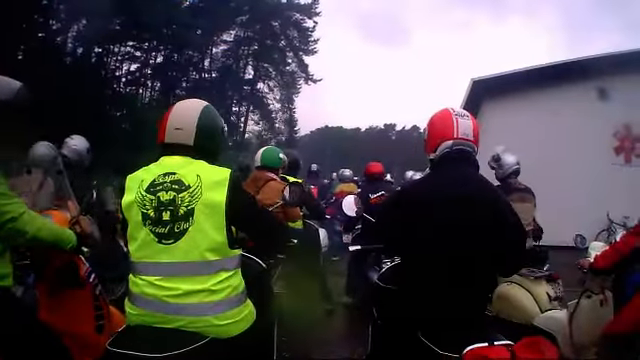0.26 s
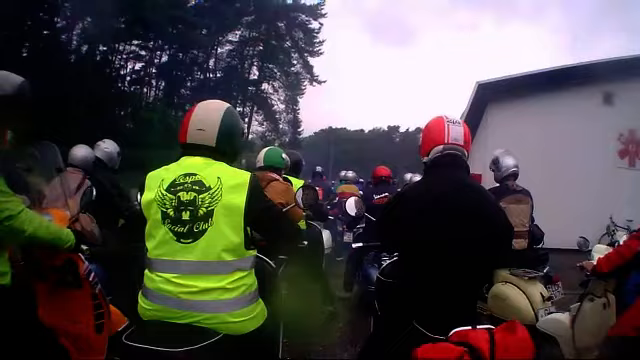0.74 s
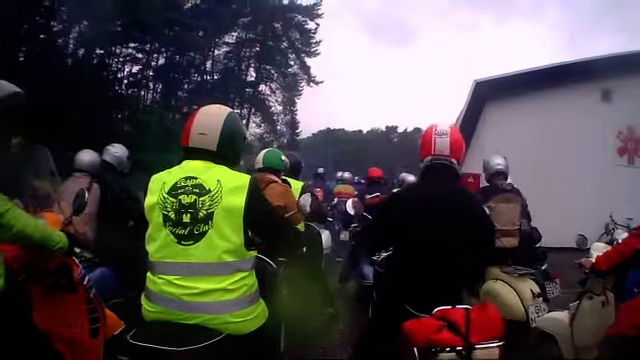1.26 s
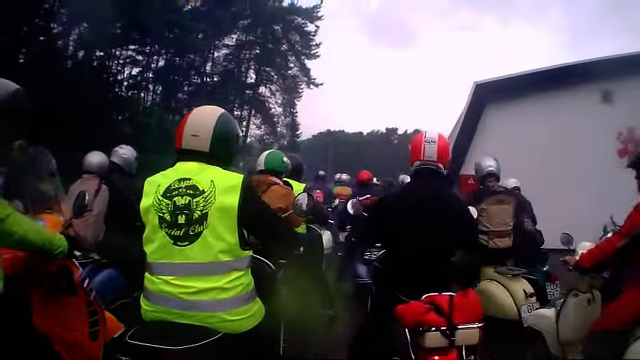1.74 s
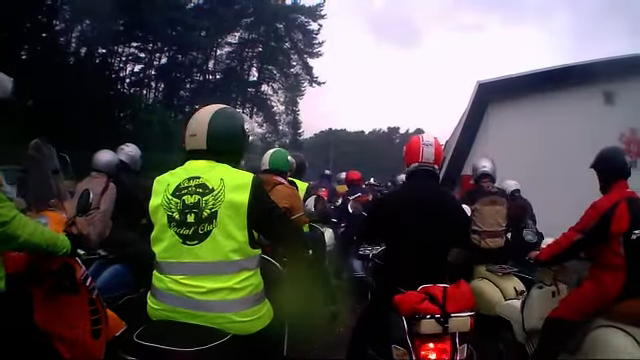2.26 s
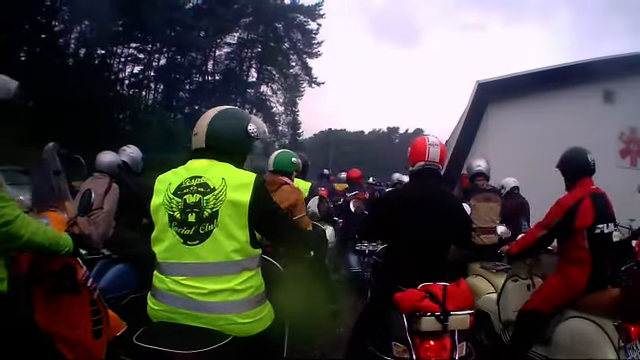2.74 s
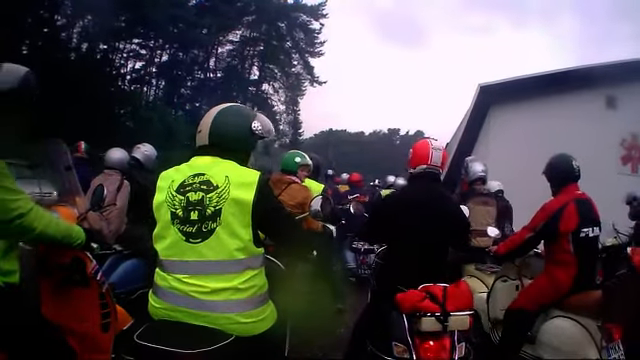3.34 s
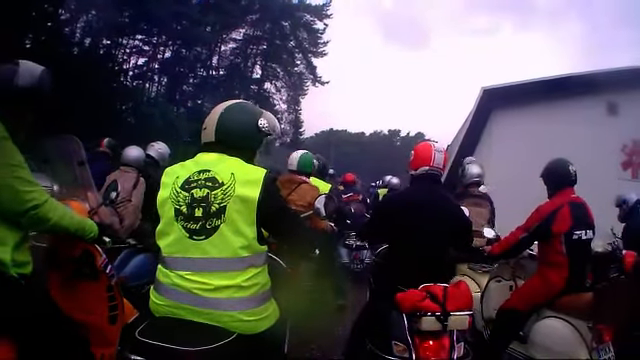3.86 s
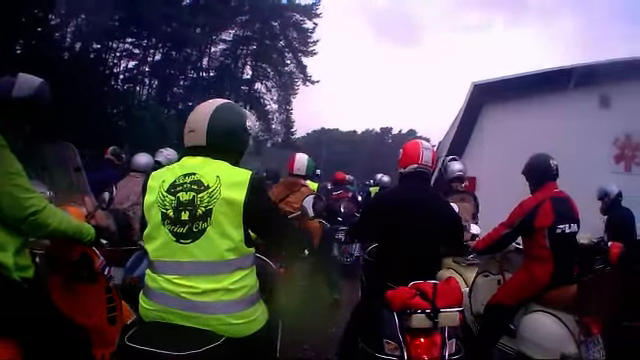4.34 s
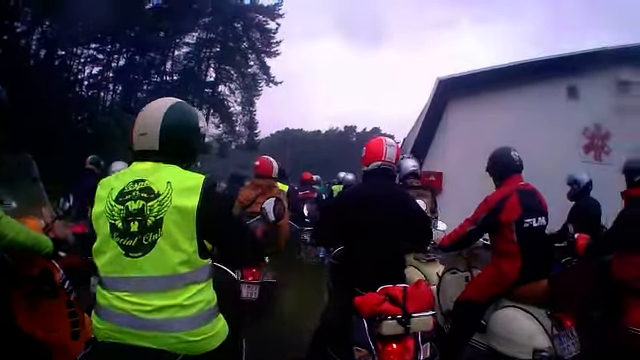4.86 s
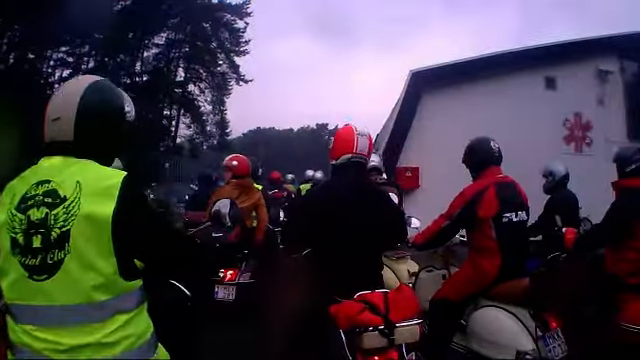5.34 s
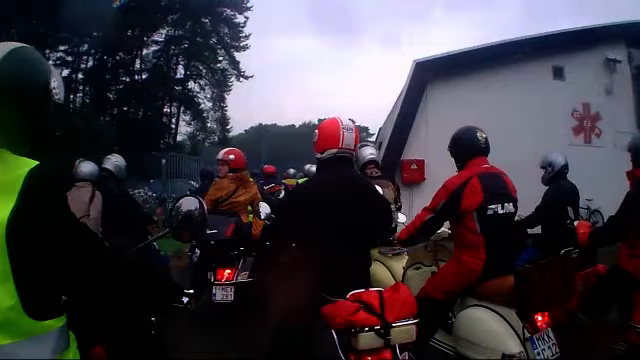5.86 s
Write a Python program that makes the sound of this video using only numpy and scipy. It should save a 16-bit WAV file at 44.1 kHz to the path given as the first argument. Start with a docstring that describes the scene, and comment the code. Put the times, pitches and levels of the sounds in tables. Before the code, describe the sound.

A small scooter engine idles very close from the start, firing about fifteen times a second: a low wavering hum, soft dull exhaust thumps and a dry plastic rattle from the shaken camera housing. Many other engines form a patchy, muffled drone behind it outdoors. From 0.5 to 1.0 s a regular run of heavier chugs jolts the housing. A hollow bump lands at 1.3 s, a sharp clack near 1.45, then the loudest hard, clipped knocks at 2.0-2.3 s. Smaller knocks and buzzing rattle continue to about 3.7 s, followed by a calmer idle. At 4.3 s an engine takes over, revving quickly to a peak around 5.1 s and falling back by 5.75, with strong rattles, knocks at 4.6 and a dense rough burst at 5.4-5.7. A duller hollow bump comes at 5.8 s as the idle returns. Cheap, boxy microphone, little treble.

```python
"""Small scooters wait in a queue; a camera rides on one of them. From the start its single cylinder idles
(wavering sines), thumps ring its exhaust pipe, shaking rattles the camera housing (noisy contacts ring its
modes), far engines drone (patchy noise) and knocks ring the housing. From 0.5 s a run of heavy firings
jolts it, and at 1.3 s and 5.8 s something hollow is bumped. At 4.3 s another engine revs up and falls back,
taking over from the idle until 5.75 s. A cheap microphone cuts the treble and clips the hardest knocks."""
import sys
import numpy as np
from scipy import signal
from scipy.io import wavfile
from scipy.ndimage import uniform_filter1d

SR = 44100
rng = np.random.default_rng(int(sys.argv[2]) if len(sys.argv) > 2 else 0)


def wav_record(signal):
    """Record a signal, one row per channel, as 16-bit PCM in the file named by sys.argv[1]."""
    frames = np.transpose(np.atleast_2d(signal))
    bounded = np.clip(frames, -1, 1)
    # unit amplitude maps onto the largest positive 16-bit level
    quanta = np.round(bounded * 32767).astype(np.int16)
    wavfile.write(sys.argv[1], SR, quanta)


def voltage_ratio(decibels):
    """Convert decibels (scalar or array-like) to amplitude ratios, 20 dB per decade."""
    exponent = np.asarray(decibels, float) / 20
    return 10 ** exponent


N = 269010

# idling engine: (time [s], firing rate [1/s], gain on its orders [dB])
IDLE_TRACK = [(0.0, 14.6, -41), (0.05, 16.6, -31.5), (0.4, 14.7, -46), (0.55, 14.4, -33),
              (0.95, 16.4, -39.5), (1.2, 15.7, -42.5), (1.6, 16, -42), (2.0, 15, -48), (2.2, 15.03, -35),
              (3.0, 15.03, -32), (3.36, 15.03, -33), (3.49, 14.57, -35), (3.95, 14.6, -32),
              (4.1, 15.2, -48), (4.35, 15.06, -25.5), (5.7, 15.73, -40), (5.85, 13.15, -36),
              (6.1, 14.6, -41)]
# its hum: (multiple of the firing rate, relative level [dB])
IDLE_ORDERS = [(2, -10), (3, 0.5), (4, -20), (5, -24.5), (6, -22.5), (8, -24.5), (9, -10), (11, -16),
               (12, -14)]
# strength of the exhaust thumps: (time [s], level [dB])
EXHAUST_TRACK = [(0.0, -32), (0.15, -40.5), (0.38, -45.5), (0.51, -43), (0.85, -38), (1.1, -49.5),
                 (1.85, -54.5), (2.3, -42), (2.9, -40), (3.26, -39.5), (3.5, -41.5), (3.97, -40.5),
                 (4.06, -50), (4.4, -37.5), (4.57, -32), (4.77, -34), (5.08, -29.5), (5.28, -47.5),
                 (5.47, -21.5), (5.69, -30), (5.74, -48), (5.9, -34.5), (6.1, -49.5)]
# exhaust resonances: (frequency [Hz], width [Hz], relative level [dB])
PIPE_MODES = [(143, 61, -3.5), (179, 59, 7), (237, 240, -4)]
# shaking of the mount: (time [s], rattle level [dB])
SHAKE_TRACK = [(0.0, -31.5), (0.33, -40), (0.52, -32.5), (1.04, -33.5), (1.25, -39), (1.95, -42),
               (2.25, -29), (2.52, -27), (2.65, -34.5), (2.92, -26), (3.26, -28), (3.48, -33),
               (3.63, -27.5), (3.95, -30), (4.0, -43.5), (4.19, -44), (4.23, -30), (4.4, -22.5),
               (4.47, -30), (4.59, -17), (4.8, -36), (4.97, -24), (5.12, -28.5), (5.24, -38.5), (5.48, -17),
               (5.64, -17.5), (5.72, -34), (5.93, -31.5), (6.1, -37.5)]
# camera housing modes: (frequency [Hz], width [Hz], limited in ring(), relative level [dB])
HOUSING_MODES = [(605, 360, -46.5), (738.5, 29, -6), (811, 44, 4), (905.6, 41.3, 6), (1180, 220, -37),
                 (1638, 140, 2.5), (1771, 85, 3.5), (1900, 240, -1), (2454, 226, 1.5), (2757, 110, -3.5),
                 (3250, 1200, -36.5)]
# limits between the dull, middle and bright housing modes: (frequency [Hz])
PART_LIMITS_HZ = [1100, 2200]
# spectrum of the far engines: (frequency [Hz], relative level [dB per Hz])
DRONE_SPECTRUM = [(12, -25.5), (20, 0), (53, -0.5), (97, -13.5), (167, -8), (396, -9), (584, 3.5),
                  (921, -1), (1220, -18.5), (1760, -10), (2140, -18), (2840, -12.5), (3520, -18.5),
                  (4580, -54.5), (7740, -120)]
# loud knocks, peak of each part: (time [s], dull [dB], middle [dB], bright [dB], thud [dB])
KNOCK_ROWS = [(.046, -24, -23, -33.5, -30), (.148, -20.5, -26, -38.5, -24), (.191, -21.5, -28, -29.5, -45),
              (.243, -21, -30.5, -32.5, -26), (.39, -25, -33.5, -29.5, -43), (.894, -11.5, -16.5, -17, -43),
              (1.137, -22.5, -26, -32, -50), (1.202, -22.5, -18.5, -25.5, -28),
              (1.29, -21.5, -30, -22.5, -41), (1.329, -20, -10, -9, -27), (1.349, -17, -21.5, -28, -45),
              (1.369, -24, -24.5, -28, -42), (1.389, -23, -27, -33, -46), (1.458, -13.5, 4, -1, -39),
              (1.568, -23, -29.5, -38, -48), (1.597, -30, -30, -43, -52), (1.629, -13.5, -9.5, -21.5, -33),
              (1.661, -23, -33, -44, -53), (1.694, -30, -33, -33.5, -50), (1.892, -30, -17.5, -33, -29),
              (2.003, -18, -3, -12, -42), (2.014, -8, 8.5, 2.5, -25), (2.087, -9, -6, -21.5, -31),
              (2.138, -17.5, -22, -20, -50), (2.189, -17.5, -11.5, -20, -33.5), (2.201, -7, 8.5, 6, -21.5),
              (2.267, 0, 6.5, 0, -21.5), (2.326, -13.5, -15, -17.5, -32), (2.388, -14, -11, -9.5, -40),
              (2.454, -15, -10, -14, -33), (2.521, -18.5, -11.5, -13, -30), (2.575, -14.5, -27, -16, -31),
              (2.696, -19.5, -22, -20.5, -36.5), (2.792, -13, -12, -11.5, -32),
              (2.865, -26.5, -16, -19, -26), (2.956, -17, -19, -27, -25), (3.089, -17.5, -14.5, -20, -33),
              (3.171, -11, -17, -28.5, -32), (3.27, -14, -16.5, -21, -30), (3.329, -20, -18, -19.5, -43),
              (3.551, -14, -8, -9, -42), (3.74, -25, -16, -23, -48), (4.052, -25, -30.5, -32.5, -46),
              (4.164, -26.5, -27, -26.5, -37), (4.216, -17.5, -18, -18.5, -45),
              (4.381, -12.5, -12, -26, -15), (4.465, -26, -37, -21, -40), (4.579, -9, -1, -0.5, -13.5),
              (4.642, -13.5, -15, -22.5, -22), (4.687, -17, -9.5, -12, -18),
              (4.736, -22, -24.5, -22.5, -37), (5.024, -16.5, -14, -32, -32), (5.05, -11.5, -9, -26.5, -31),
              (5.079, -11.5, -15.5, -15, -22), (5.108, -14.5, -21.5, -21.5, -23),
              (5.139, -14.5, -16, -25, -25), (5.324, -17, -23, -22, -27.5),
              (5.35, -11.5, -17.5, -20.5, -28), (5.377, -9, -18, -29.5, -16.5), (5.442, -3.5, -1, 3.5, -12),
              (5.481, 0.5, -13.5, -8.5, -14), (5.5, -2, -12.5, -10, -17.5),
              (5.52, -22.5, -15.5, -22.5, -30), (5.541, -12.5, -8.5, -12.5, -15),
              (5.55, -13.5, -6, -11.5, -21), (5.569, -13.5, -5.5, -13, -21), (5.608, -9, -15, -22, -18),
              (5.638, -16.5, -7.5, -19.5, -25), (5.661, -10, -7.5, -18.5, -20),
              (5.769, -19, -23.5, -27.5, -37), (5.8, -6.5, -23.5, -23, -32)]
# peaks in the run of heavy firings, before fade and spread: (dull [dB], middle [dB], bright [dB], thud [dB])
CHUG_PEAKS_DB = (-14.5, -25, -26.5, -19.5)
# hollow bumps, perhaps on the bodywork: (time [s], peak [dB])
BUMP_ROWS = [(1.329, -4.5), (5.8, -15.5)]
# what the bumps ring: (frequency [Hz], width [Hz], relative level [dB])
HOLLOW_MODES = [(480, 300, -15), (684, 110, 8.5), (1430, 160, 1)]
# revving engine: (time [s], firing rate [1/s], gain on its orders [dB])
REV_TRACK = [(4.3, 22.4, -35), (4.43, 24.3, -34.5), (4.59, 27.1, -26), (4.76, 31.5, -39), (4.93, 32.8, -27),
             (5.1, 34.1, -28.5), (5.256, 30.3, -33), (5.308, 28.8, -50), (5.374, 26.9, -27.5),
             (5.54, 21.8, -26), (5.619, 22, -26.5), (5.75, 17.7, -51.5)]
# its hum: (multiple of the firing rate, relative level [dB])
REV_ORDERS = [(1, -10), (2, 1), (3, -25.5), (4, -5.5), (5, -13), (6, -12), (7, -15), (8, -14)]


def evened(x):
    """Scales to rms 1."""
    return x / np.sqrt(np.mean(x ** 2) + 1e-20)


def curves(rows):
    """Interpolates the columns of a table to every sample."""
    time_s, *columns = np.transpose(rows)
    return [np.interp(np.arange(N) / SR, time_s, column) for column in columns]


def slow(per_s):
    """Smooth chance of rms 1: noise averaged twice over 1 / per_s seconds."""
    span = int(SR / per_s)
    once = uniform_filter1d(rng.standard_normal(N), span)
    return evened(uniform_filter1d(once, span))


def ring(hz, width_hz, db):
    """One struck mode: a sine that dies faster the wider its resonance."""
    t = np.arange(4096) / SR
    decay = np.exp(-np.pi * np.clip(width_hz, 10, 900) * t)
    return voltage_ratio(db) * decay * np.sin(2 * np.pi * hz * t)


def ring_all(modes):
    """Sum of struck modes."""
    return sum(ring(*mode) for mode in modes)


def no_bass(x, hz):
    """Steep high-pass."""
    return signal.sosfilt(signal.butter(4, hz, "high", fs=SR, output="sos"), x)


def strokes(turns, jitter_s):
    """One click of about size 1 near every whole turn."""
    at = np.flatnonzero(np.diff(np.floor(turns)) > 0)
    shift = (jitter_s * SR * rng.standard_normal(N)[at]).astype(int)
    clicks = np.zeros(N)
    clicks[np.clip(at + shift, 0, N - 1)] = 1
    return clicks


def hum(turns, orders, waver_db):
    """Low engine orders as sines, each wavering in strength."""
    total = 0
    for multiple, db in orders:
        strength = np.sqrt(2) * voltage_ratio(db + waver_db * slow(10))
        total = total + strength * np.sin(2 * np.pi * (multiple * turns + rng.random()))
    return total


def idler():
    """Hum of the idling engine, giving way to the revving one; returns it with the firing rate."""
    rate_hz, gain_db = curves(IDLE_TRACK)
    orders = hum(np.cumsum(rate_hz) / SR, IDLE_ORDERS, waver_db=1.0)
    return (1 - revving()) * voltage_ratio(gain_db) * orders, rate_hz


def exhaust(rate_hz):
    """One uneven thump per firing, over a rough burble, rings in the pipe."""
    fired = strokes(np.cumsum(rate_hz) / SR + .1, jitter_s=0.00033)
    fired *= voltage_ratio(2.4 * rng.standard_normal(N))
    burble = 0.009 * rng.standard_normal(N)
    puff = signal.windows.hann(120)  # a soft push keeps the thump dull
    pipe = np.convolve(puff, ring_all(PIPE_MODES))
    thumps = signal.oaconvolve(fired + burble, pipe)[:N]
    per_firing = np.sqrt(np.mean(rate_hz) / rate_hz)  # faster firing, same loudness
    return voltage_ratio(curves(EXHAUST_TRACK)[0]) * evened(per_firing * thumps)


def housing_parts():
    """The housing's modes in a dull, a middle and a bright group; the small shell sends out no bass."""
    group = np.searchsorted(PART_LIMITS_HZ, [hz for hz, width_hz, db in HOUSING_MODES])
    parts = []
    for part in range(3):
        modes = [mode for mode, g in zip(HOUSING_MODES, group) if g == part]
        parts.append(no_bass(ring_all(modes), hz=450))
    return parts


def rattle(swing_hz):
    """A loose part hits its stop on every swing of the frame, out and back, with stray ticks between."""
    miss_db, reach_db = -46, 14  # below this shaking few swings hit the stop; this much above, all do
    contact_decay_s = 0.0011
    level_db = curves(SHAKE_TRACK)[0]
    turns = np.cumsum(swing_hz) / SR + .3
    hits = strokes(turns, jitter_s=0.00095) + voltage_ratio(2.5) * strokes(turns + .55, jitter_s=0.0013)
    hits += voltage_ratio(-6.5) * (rng.random(N) < 110 / SR)  # stray ticks, 110 per s before misses
    hits *= rng.random(N) < np.clip((level_db - miss_db) / reach_db, .15, 1)  # weak swings often fall short
    hits *= voltage_ratio(3.0 * np.clip(rng.standard_normal(N), -3, 1.6) + 1.2 * slow(20))  # uneven strength
    contact = signal.lfilter([1], [1, -np.exp(-1 / (contact_decay_s * SR))], hits)
    shared_noise = rng.standard_normal(N)
    total = 0
    for part, body in enumerate(housing_parts()):
        noise = shared_noise + 1.03 * rng.standard_normal(N)
        flicker = voltage_ratio(part * (-0.22 + 0.91 * slow(16)))  # strongest in the bright group
        total = total + flicker * signal.oaconvolve(contact * noise, body)[:N]
    return voltage_ratio(level_db) * evened(total)


def drone():
    """The rest of the queue blurs into patchy noise that the shaken housing passes on more strongly."""
    level_db, patch_db, swell_per_shake_db = -38.5, 1.3, 0.31
    bin_hz = np.fft.rfftfreq(1024, 1 / SR)
    real, imag, patches = rng.standard_normal((N // 256 + 5, 513, 3)).T
    patches = uniform_filter1d(patches, 8, 0)  # over frequency
    patches = evened(uniform_filter1d(patches, 10, 1))  # over time
    hz, db = np.transpose(DRONE_SPECTRUM)
    spectrum_db = np.interp(np.log(bin_hz + 1), np.log(hz + 1), db)
    bins = (real + 1j * imag) * voltage_ratio(spectrum_db[:, None] + patch_db * patches)
    noise = signal.istft(bins, nperseg=1024, noverlap=768)[1][:N]
    swell = voltage_ratio(swell_per_shake_db * curves(SHAKE_TRACK)[0])
    return voltage_ratio(level_db) * evened(swell * noise)


def strike(rows, bodies, push):
    """Each row is a few ms of rough contact, partly one steady push, that rings every body at its own peak."""
    t = np.arange(600) / SR
    contact = np.exp(-t / 0.002) * np.clip(t / 0.0005, 0, 1)
    grit = rng.standard_normal((len(rows), len(bodies), len(t))) + np.reshape(push, (-1, 1))
    out = np.zeros(N + 5000)
    for (time_s, *peaks_db), drives in zip(rows, grit):
        at = round(time_s * SR)
        for peak_db, body, drive in zip(peaks_db, bodies, drives):
            sound = signal.fftconvolve(drive * contact, body)
            out[at:at + len(sound)] += voltage_ratio(peak_db) * sound / abs(sound).max()
    return out[:N]


def knocks():
    """Knocks and the run of heavy firings ring the housing with a low thud."""
    thud = np.convolve(ring(150, 92, 0), ring(220, 100, 0))[:4096]
    bodies = housing_parts() + [no_bass(thud, hz=105)]
    return strike(KNOCK_ROWS + chugs(), bodies, push=[0, 0, 0, 2.5])


def chugs():
    """Knock rows for heavy firings that jolt the housing: evenly spaced, dull, fading at the end."""
    start_s, gap_s, count = .502, .0625, 9
    fade_db, spread_db = -3.5, 1.5
    k = np.arange(count)
    change_db = fade_db * (k / k[-1]) ** 3 + spread_db * rng.standard_normal(count)
    return list(np.c_[start_s + gap_s * k, change_db[:, None] + CHUG_PEAKS_DB])


def bumps():
    """Bumps ring something hollow."""
    hollow = no_bass(ring_all(HOLLOW_MODES), hz=367)
    return strike(BUMP_ROWS, [hollow], push=[1.5])


def revving():
    """Share of the revving engine, fading in and out over the idling one."""
    t = np.arange(N) / SR
    start_s, end_s, fade_s = REV_TRACK[0][0], REV_TRACK[-1][0], 0.078
    return np.clip(np.minimum(t - start_s, end_s - t) / fade_s, 0, 1)


def revver():
    """Hum of the engine that speeds up and slows down; returns it with the firing rate."""
    rate_hz, gain_db = curves(REV_TRACK)
    orders = hum(np.cumsum(rate_hz) / SR, REV_ORDERS, waver_db=0.43)
    return revving() * voltage_ratio(gain_db) * orders, rate_hz


def scene():
    """All sources; the frame swings with the strongest order of the engine that leads."""
    idle, idle_hz = idler()
    rev, rev_hz = revver()
    rev_leads = revving() > 0
    firing = exhaust(np.where(rev_leads, rev_hz, idle_hz))
    swing_hz = np.where(rev_leads, 2 * rev_hz, 3 * idle_hz)
    mix = idle + firing + rattle(swing_hz) + drone() + knocks() + bumps() + rev
    return mix[None]


def top_cut(x):
    """Nothing passes above the cut-off."""
    return signal.sosfilt(signal.butter(12, 4000, fs=SR, output="sos"), x)


def record(dry):
    """Cheap microphone: steep treble cut, then hard clipping, which splashes above the cut."""
    edge_hz = 3740
    lowpass = signal.firwin(401, edge_hz, window=("kaiser", 13), fs=SR)
    narrow = signal.oaconvolve(dry, lowpass[None], "same")
    return top_cut(np.clip(narrow, -1, 1))


dry = scene()
out = record(dry)
wav_record(out)
```